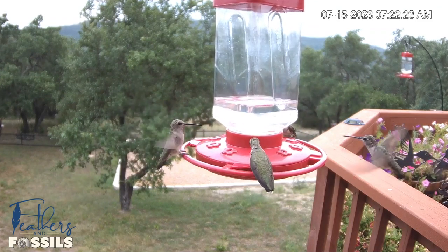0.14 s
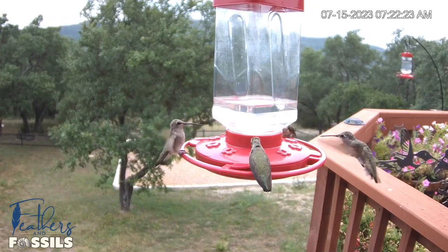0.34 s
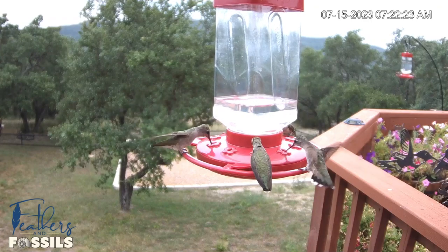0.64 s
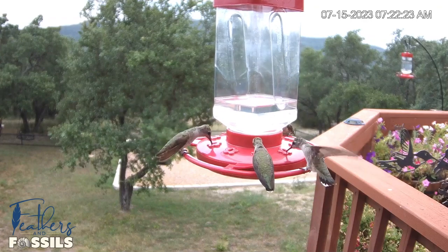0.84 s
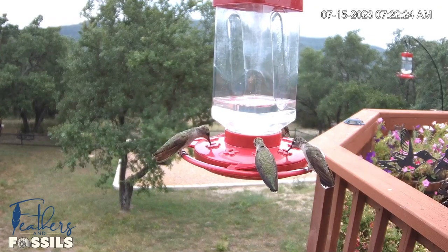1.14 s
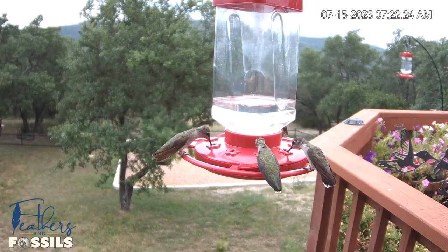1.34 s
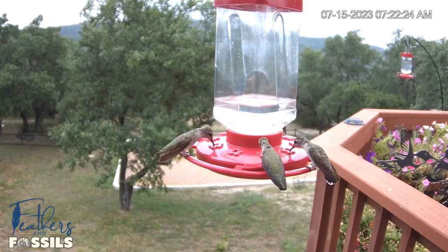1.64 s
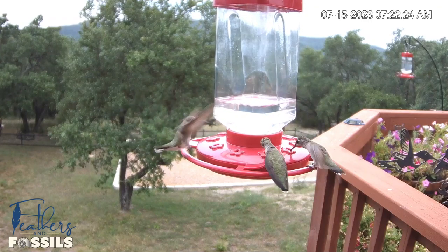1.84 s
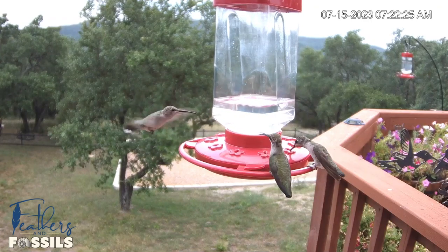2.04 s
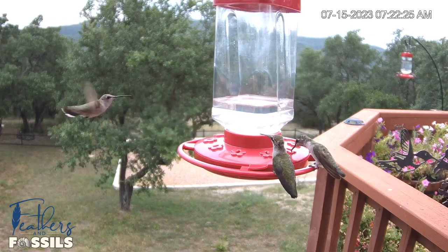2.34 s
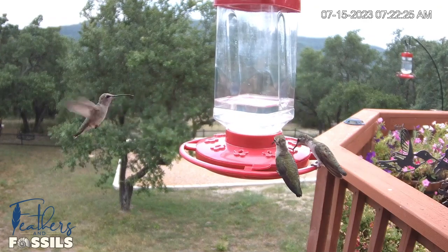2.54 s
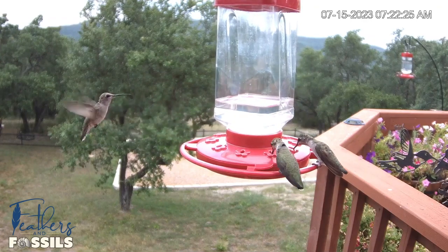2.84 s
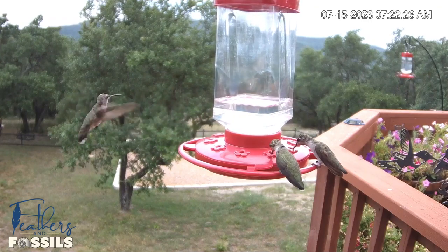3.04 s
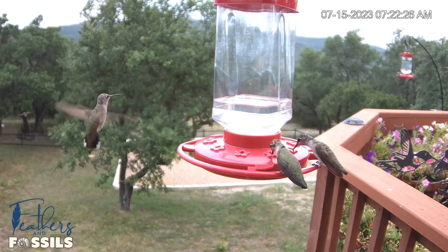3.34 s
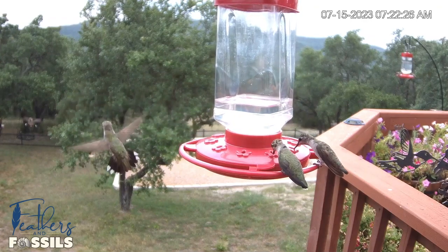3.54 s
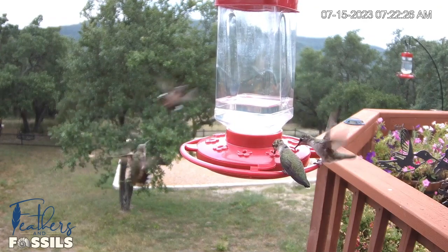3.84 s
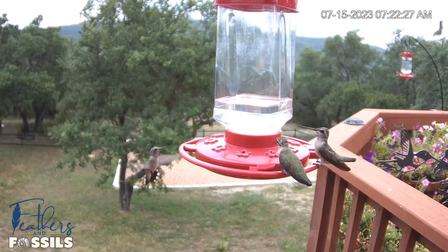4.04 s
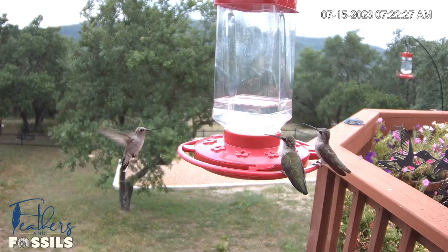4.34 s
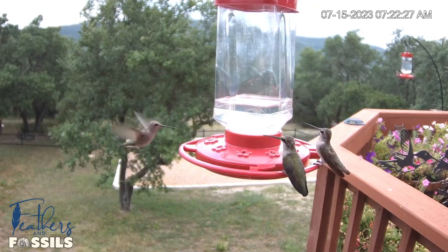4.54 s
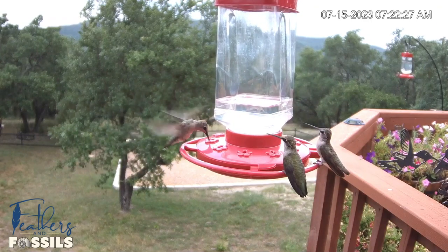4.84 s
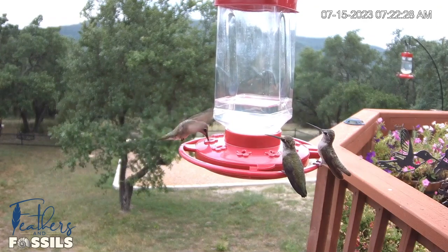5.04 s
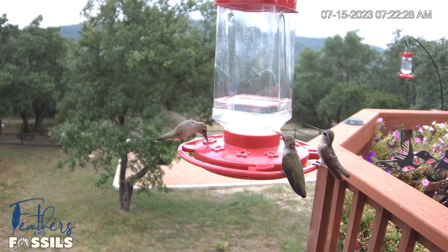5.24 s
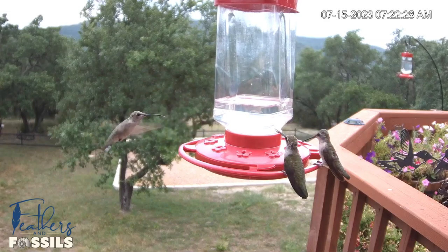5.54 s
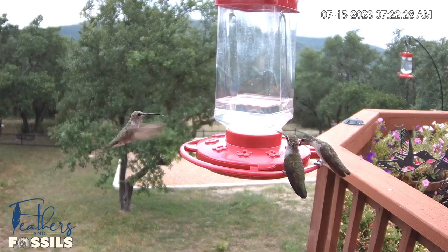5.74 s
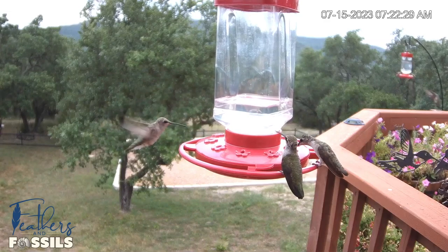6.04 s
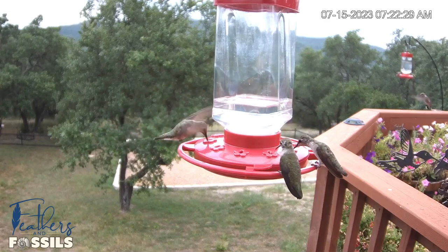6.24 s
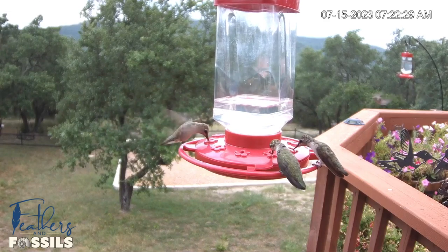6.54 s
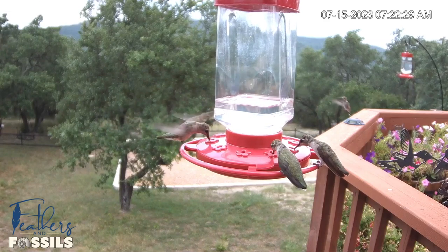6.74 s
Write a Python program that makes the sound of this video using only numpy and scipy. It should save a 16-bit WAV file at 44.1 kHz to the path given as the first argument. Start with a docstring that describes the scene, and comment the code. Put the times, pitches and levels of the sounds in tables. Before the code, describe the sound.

Hummingbirds chip and squabble around an outdoor feeder, softly then in a loud close burst, over rumbling breeze and distant songbirds.

```python
"""Throughout: shaped-noise hush, downwash from hovering wings rumbling in puffs on a small camera's microphone,
a faint sine wing hum, and far songbirds as gliding tones over a noise chorus. From 0.5 s single hummingbird
chips flick upward. At 1.1-1.8 s hummingbirds squabble softly across a deck: falling squeaks, a trilled buzz, a
twitter of pitch arches. At 3.7-4.4 s they squabble loudly close by, with the strongest puffs until 5.1 s; then
chips, far birds and a last puff. Hummingbird calls are tones with overtones, echoed by the house wall,
scattered by the deck and trailed by the trees."""
import sys
import numpy as np
from scipy import signal
from scipy.fft import rfft, irfft, next_fast_len
from scipy.io import wavfile
from scipy.ndimage import uniform_filter1d, map_coordinates

SR = 44100
rng = np.random.default_rng(int(sys.argv[2]) if len(sys.argv) > 2 else 0)


def int16_out(signal):
    """Quantize to a 16-bit WAV file."""
    q = np.round(np.clip(np.atleast_2d(signal).T, -1, 1) * 32767)
    wavfile.write(sys.argv[1], SR, q.astype(np.int16))


N = 303848

# left-right likeness of the outdoor hush: (frequency [Hz], correlation [-1..1])
HUSH_LIKENESS = [(60, 0.29), (200, 0.97), (500, 0.99), (1000, 0.98), (2000, 0.88), (4000, 0.17),
                 (7000, 0.067)]
# decay of the reflections among the trees: (frequency [Hz], t60 [s])
TREE_DECAY = [(1500, .35), (4000, 0.13), (7000, 0.29)]


def amp(db):
    """Decibels to gain."""
    return 10 ** (np.asarray(db) / 20)


def unit(x):
    """Scale to rms 1."""
    return x / np.sqrt(np.mean(x ** 2) + 1e-20)


def along(points, hz):
    """Interpolate (frequency [Hz], value) points on a log frequency axis."""
    point_hz, values = np.transpose(points)
    return np.interp(np.log(hz + 1), np.log(point_hz + 1), values)


def curve(rows):
    """Interpolate (time [s], value) rows to one value per sample."""
    return np.interp(np.arange(N) / SR, *np.transpose(rows))


def filtered(x, response):
    """Apply a frequency response, given as a function of Hz."""
    size = next_fast_len(N + SR // 2)
    spectrum = rfft(x, size) * response(np.fft.rfftfreq(size, 1 / SR))
    return irfft(spectrum, size)[..., :N]


def add(track, start_s, sound):
    """Mix a sound into a track, cut at the track's end."""
    start = max(0, round(start_s * SR))
    part = track[..., start:start + sound.shape[-1]]
    part += sound[..., :part.shape[-1]]


def progress(length_s):
    """Ramp from 0 to 1 over a note."""
    return np.linspace(0, 1, max(int(length_s * SR), 8))


def fade(u, rise, fall):
    """Sine-squared start and end; rise and fall are shares of the note."""
    ramp = np.clip(np.minimum(u / rise, (1 - u) / fall), 0, 1)
    return np.sin(np.pi / 2 * ramp) ** 2


def waver(size_samples):
    """Smoothed random tremble of rms 1."""
    noise = rng.standard_normal(size_samples)
    return unit(uniform_filter1d(uniform_filter1d(noise, size=50), size=40))


def wobble(knots_per_s):
    """Smooth random curve through evenly spaced knots."""
    return map_coordinates(rng.standard_normal(1024), [np.arange(N) * knots_per_s / SR], mode="wrap")


def rush(spectrum, likeness, patchy_db):
    """Stereo noise of rms 1, with random gain patches in time and frequency."""
    bins = signal.stft(rng.standard_normal((2, N)), nperseg=512)[2]
    field = uniform_filter1d(rng.standard_normal(bins.shape[1:]), size=5, axis=0)
    field = uniform_filter1d(field, size=14, axis=1)
    pair = signal.istft(bins * amp(patchy_db * unit(field)), nperseg=512)[1][:, :N]

    def mid_side_response(hz):
        # mid/side power split sets the left-right correlation
        angle = np.arccos(np.clip(along(likeness, hz), -1, 1)) / 2
        return amp(along(spectrum, hz)) * [np.cos(angle), np.sin(angle)]

    mid, side = filtered(pair, mid_side_response)
    return unit(np.array([mid + side, mid - side]))


def diffuse(sound, decay, width=0.88):
    """Convolve with a fresh stereo noise tail whose decay time depends on frequency."""
    hz, t, bins = signal.stft(rng.standard_normal((2, SR // 2)), SR, nperseg=128)
    decay_gain = amp(-60 * t / along(decay, hz)[:, None])
    mid, side = signal.istft(bins * decay_gain, SR, nperseg=128)[1]
    tail = np.array([mid + width * side, mid - width * side])
    return signal.fftconvolve(sound[None], tail / np.linalg.norm(tail[0]), axes=1)


def outdoor_hush(level_db=-64.0):
    """Steady noise weighted to the low end."""
    # (frequency [Hz], relative density [dB per Hz])
    hush_spectrum = [(25, -15.5), (55, -11.5), (100, -4.5), (160, -4), (230, -3), (400, -4.5), (720, -10.5),
                     (1100, -17.5), (1600, -23.5), (2800, -33), (4500, -39.5), (7500, -42.5)]
    return amp(level_db) * rush(hush_spectrum, HUSH_LIKENESS, patchy_db=1)


def buffeting(flutter_db=2, flutter_knots_per_s=12, rumble_db=-4, evenness=.6, low_cut_hz=40,
              rise=0.19, fall=0.4, sag=0.31, lag_s=0.001094):
    """Downwash from hovering wings rumbles on the microphone; puffs swell it, push at a sinking pitch and stir
    turbulence."""
    # puffs of air: (time [s], length [s], mid-puff pitch [Hz], flow level [dB], turbulence re flow [dB])
    puffs = [(.01, .16, 55, -49, -24), (0.354, 0.11, 60, -49, -9.5), (0.659, .13, 53, -51, -22),
             (.992, 0.066, 69.2, -42, -23), (1.292, 0.13, 75.5, -34, -21.5),
             (1.433, 0.099, 71.3, -38.5, -11.5), (1.551, 0.08, 69.3, -34.5, -10),
             (1.696, 0.057, 75.8, -39.5, -21), (1.8, 0.083, 59, -35, -20), (1.92, .11, 64.4, -36.5, -21),
             (2.189, .1, 58.3, -43.5, -20.5), (2.537, 0.067, 63.4, -40.5, -29),
             (3.222, 0.086, 67.3, -42.5, -28), (3.331, 0.09, 60.3, -47, -25), (3.478, 0.16, 66.9, -45, -26),
             (3.767, .12, 65.4, -37, -25.5), (3.934, .13, 83.2, -29, -16.5), (4.158, 0.077, 60.5, -39, -26),
             (4.299, .12, 69, -37, -19.5), (4.434, .06, 74.6, -37.5, -18), (4.579, 0.096, 62.2, -42, -25),
             (4.815, 0.086, 65.7, -37.5, -24), (4.902, 0.11, 72, -28.5, -10), (5.003, 0.086, 66, -30, -19),
             (5.093, 0.054, 61.2, -41, -26), (5.897, 0.08, 70.5, -45, -30), (6.15, 0.16, 61.8, -52.5, -27),
             (6.631, 0.069, 62, -43.5, -26), (6.82, 0.22, 75.9, -32, -17)]
    # drifting air: (time [s], level [dB])
    downwash_levels = [(0.0, -55), (0.9, -73.5), (1.38, -49.5), (1.5, -40), (1.84, -42), (1.98, -45.5),
                       (2.38, -68.5), (2.84, -59.5), (3.36, -49), (3.57, -51), (4.18, -44.5), (4.49, -43.5),
                       (4.64, -53), (4.85, -54), (4.99, -41.5), (5.55, -61.5), (6.5, -65.5), (6.89, -51)]
    # rumble ahead of the low cut: (frequency [Hz], relative density [dB per Hz])
    rumble_spectrum = [(15, -47.5), (25, -15.5), (40, 1), (52, 5), (66, 1), (80, -2.5), (100, -9),
                       (170, -25), (300, -37.5), (420, -46), (900, -87)]
    # rumble ahead of the port lag: (frequency [Hz], left-right correlation [-1..1])
    rumble_likeness = [(30, 1), (70, 1), (130, 0.6)]
    # turbulence ahead of the low cut: (frequency [Hz], relative density [dB per Hz])
    swirl_spectrum = [(50, -6), (120, 9), (200, -6), (350, -10.5), (700, -38), (1500, -54.5)]

    gusts, pushes, stir = np.zeros((3, N))
    for start_s, length_s, pitch_hz, db, turbulence_db in puffs:
        u = progress(length_s)
        flow = amp(db) * fade(u, rise, fall)
        sinking_hz = pitch_hz * (1 - sag * (u - .5))
        cycles = rng.random() + np.cumsum(sinking_hz) / SR
        add(gusts, start_s, flow)
        add(stir, start_s, amp(turbulence_db) * flow)
        add(pushes, start_s, flow * np.sin(2 * np.pi * cycles))

    eddies = rush(rumble_spectrum, rumble_likeness, patchy_db=2)
    power = uniform_filter1d(np.mean(eddies ** 2, axis=0), size=1500)
    strength = np.sqrt(np.abs(power) + 1e-6)
    even_eddies = unit(eddies / strength ** evenness)
    downwash = amp(curve(downwash_levels) + flutter_db * wobble(flutter_knots_per_s))
    rumble = np.hypot(downwash, amp(rumble_db) * gusts) * even_eddies
    turbulence = stir * rush(swirl_spectrum, [(100, 0.77)], patchy_db=2.5)

    def port_response(hz):
        # air reaches the left port first
        lag = np.exp(1j * np.pi * hz * lag_s * np.array([[1], [-1]]))
        return lag * hz ** 2 / np.hypot(hz ** 2, low_cut_hz ** 2)

    return filtered(rumble + pushes + turbulence, port_response)


def wings(hum_hz=96, drift=0.091, flutter_db=4):
    """Faint sine hum of hovering wings, unsteady in pitch and level."""
    # (time [s], level [dB])
    hum_levels = [(0, -59), (.45, -59.5), (.85, -74), (1.15, -67.5), (2.45, -66), (2.8, -72), (5.5, -72.5),
                  (6.89, -71.5)]
    hz = hum_hz * (1 + drift * wobble(22))
    hum = unit(np.sin(2 * np.pi * np.cumsum(hz) / SR))
    return amp(curve(hum_levels) + flutter_db * wobble(14)) * hum


def songbirds(chorus_db=-80, wet_db=-5, direct_db=-1):
    """Far gliding whistles, rasped by random pitch and blurred by the trees, over a patchy noise chorus."""
    # (frequency [Hz], relative density [dB per Hz])
    chorus_spectrum = [(2000, -23), (2600, -6.5), (3300, -6), (3750, 0), (4200, -5), (5300, -9),
                       (5900, -4.5), (6550, -2.5), (7200, 0), (7600, -9)]
    # (time [s], length [s], start pitch [Hz], end pitch [Hz], rms pitch rasp [Hz],
    #  level ahead of the direct/wet split [dB])
    whistles = [(0.062, 0.1, 3910, 4000, 150, -68), (0.341, 0.11, 3970, 3680, 250, -74),
                (2.383, 0.11, 6680, 6460, 444, -74), (2.848, 0.046, 4990, 4760, 50, -68.5),
                (4.463, .10, 5850, 5590, 60.1, -62), (4.506, 0.071, 4120, 4150, 60.3, -72.5),
                (4.675, 0.049, 3670, 3830, 180, -74), (4.85, 0.048, 2194, 2230, 30, -74.5),
                (4.933, 0.097, 2380, 2510, 30, -73.5), (5.12, 0.057, 5682, 6770, 401.3, -70.5),
                (5.154, 0.038, 2290, 2090, 39.97, -76.5), (5.207, 0.16, 2240, 2393, 29.66, -78),
                (5.321, 0.11, 2370, 2460, 29.9, -76), (5.468, 0.12, 4010, 4020, 280.8, -76),
                (5.804, 0.024, 3600, 3000, 704, -73.5), (6.145, 0.12, 5630, 4900, 50, -77),
                (6.527, 0.046, 4195, 4310, 111, -76.5)]
    out = amp(chorus_db) * rush(chorus_spectrum, HUSH_LIKENESS, patchy_db=7.0)
    for start_s, length_s, start_hz, end_hz, rasp_hz, db in whistles:
        u = progress(length_s)
        hz = start_hz + (end_hz - start_hz) * u + rasp_hz * waver(len(u))
        tone = amp(db) * fade(u, rise=0.32, fall=0.34) * np.sin(2 * np.pi * np.cumsum(hz) / SR)
        add(out, start_s, amp(direct_db) * tone)
        add(out, start_s, amp(wet_db) * diffuse(tone, TREE_DECAY))
    return out


def syrinx(hz, jitter=0.019):
    """A slightly unsteady tone with overtones coloured by fixed resonances."""
    # (multiple of the pitch, level ahead of the colouring [dB])
    overtones = [(1, -2.5), (2, -5), (3, 0), (4, -13), (5, -28)]
    # (frequency [Hz], gain [dB])
    call_colour = [(1250, -27), (1600, -9.5), (1950, -9), (2800, -3), (3300, 0.5), (3800, 0.5),
                   (4550, -8.5), (5100, 0.5), (5500, -2), (6100, 3.5), (6700, 4.5), (7200, 8), (7700, 4)]
    hz = hz * (1 + jitter * waver(len(hz)))
    phase = 2 * np.pi * np.cumsum(hz) / SR
    tone = 0
    for multiple, db in overtones:
        partial_hz = multiple * hz
        band_gain = np.clip(4 - 12 * partial_hz / SR, 0, 1)  # fades out from SR/4 to SR/3
        tone = tone + amp(db + along(call_colour, partial_hz)) * band_gain * np.sin(multiple * phase)
    return tone


def chip(length_s=0.016, start_hz=5850, end_hz=7200, bend=0.55):
    """A short upward flick, fastest at its start."""
    u = progress(length_s)
    hz = start_hz + (end_hz - start_hz) * u ** bend
    return fade(u, rise=0.33, fall=0.18) * syrinx(hz, jitter=0.048)


def squeak(length_s, start_hz, end_hz, bend, jitter):
    """A falling whistle, raspier with more pitch jitter."""
    u = progress(length_s)
    hz = start_hz + (end_hz - start_hz) * u ** bend
    return fade(u, rise=.16, fall=0.12) * syrinx(hz, jitter)


def buzz(length_s, start_hz, end_hz, depth_hz, trills_per_s, bend=1.3, slowing=.25):
    """A falling note with a fast pitch trill that slows as the pitch sinks."""
    u = progress(length_s)
    trill = np.cos(2 * np.pi * np.cumsum(trills_per_s * (1 - slowing * (u - .5))) / SR)
    hz = start_hz + (end_hz - start_hz) * u ** bend + depth_hz * trill
    return fade(u, rise=.35, fall=0.3) * syrinx(hz, jitter=.015)


def twitter(length_s, arches_per_s, top_hz, first_dip_hz, middle_dip_hz, last_dip_hz, dip_db, swell_db,
            flatness=3.6, swell_bend=1.4):
    """One unbroken tone swings through flat-topped pitch arches, its dips drifting as it swells or fades."""
    u = progress(length_s)
    swing = np.abs(np.cos(np.pi * arches_per_s * length_s * u))
    sag = np.sin(np.pi / 2 * swing ** (2 * flatness))  # 0 at the top, 1 in the dips
    dip_hz = np.interp(u, [0, .5, 1], [first_dip_hz, middle_dip_hz, last_dip_hz])
    tone = syrinx(top_hz - sag * (top_hz - dip_hz), jitter=.013)
    level = amp(swell_db * u ** swell_bend + dip_db * sag)
    return fade(u, rise=.003 / length_s, fall=0.013) * level * tone


def heard(sound, bearing, distance, tail_db, near_scatter_db=-14, far_scatter_db=-1,
          direct_delay_s=0.0011, bounce_delay_s=0.0045):
    """A call in stereo: direct, scattered by the deck, thrown back by the wall, fading in the trees."""
    # echoes of the house: (delay [s], level [dB], bearing [signed share of the stereo phase])
    wall_echoes = [(0.0284, -8.5, 0.94), (0.0559, -43.5, 0)]
    # scatter of the deck: (frequency [Hz], t60 [s])
    deck_decay = [(1500, 0.099), (7000, 0.079)]
    # left-right phase difference at bearing 1: (frequency [Hz], phase [rad])
    stereo_phase = [(600, .1), (1300, .5), (1750, 0.83), (2500, 1.5), (5000, 1.6), (7000, 1.31)]
    # colour of a call at distance 1, from across the deck: (frequency [Hz], gain [dB])
    far_gain = [(1600, -4), (2100, 4), (2800, -18), (3600, -2.5), (4200, 7), (4800, -2.5), (6000, -3.5),
                (6700, 4), (7300, -7.5)]

    size = 2 ** 15
    hz = np.fft.rfftfreq(size, 1 / SR)
    scatter = amp(near_scatter_db + distance * (far_scatter_db - near_scatter_db))
    direct = rfft(sound, size)
    cloud = scatter * rfft(diffuse(sound, deck_decay), size)
    paths = 0
    for delay_s, db, side in [(direct_delay_s, 0, bearing)] + wall_echoes:
        left_right = np.exp(.5j * side * along(stereo_phase, hz) * np.array([[-1], [1]]))
        delay = np.exp(-2j * np.pi * hz * delay_s)
        paths = paths + amp(db) * delay * (direct * left_right + cloud)
    bounce = distance ** 2  # far calls also bounce off the deck boards
    paths = paths * (1 + bounce * np.exp(-2j * np.pi * hz * bounce_delay_s)) / np.hypot(1, bounce)
    tail = amp(tail_db) * rfft(diffuse(sound, TREE_DECAY), size)
    colour = amp(distance * along(far_gain, hz))
    return irfft((paths / np.hypot(1, scatter) + tail) * colour, size)


def hummingbirds(squabble_bearing=-1, chip_bearing=-1.4, chip_distance=0.28,
                 near_tail_db=-28, far_tail_db=-16):
    """Rivals squabble around a feeder, drier the nearer they are; single chips. Direct calls share a left-right
    phase shift."""
    # (time [s], level [dB], tree tail re call [dB])
    chips = [(0.508, -56.5, 3.5), (1.678, -42.5, -7), (3.088, -50.5, 7), (4.343, -44.5, -1),
             (4.757, -71.5, 3.5), (4.885, -68.5, -4), (5.268, -57, 0), (5.829, -58, -9),
             (6.308, -64.5, 6.5), (6.785, -47.5, 0.5)]
    # (time [s], length [s], start pitch [Hz], end pitch [Hz], bend [<1 falls early, >1 late],
    #  rms pitch jitter [share], level [dB], distance [0-1])
    squeaks = [(1.091, 0.021, 2390, 1784, 0.78, 0.027, -55, 0.56),
               (1.356, .019, 5200, 1803, 1.1, 0.064, -45, .7),
               (1.431, .013, 3900, 1750, 1, 0.06, -47, 0.58),
               (1.498, 0.015, 4020, 1900, 1.24, .12, -50.5, 0.72),
               (1.579, .015, 3960, 2140, 1.18, .12, -52, 0.61),
               (1.651, .017, 4170, 2000, 2.5, .05, -54.5, 0.9),
               (1.744, 0.019, 3914, 2034, 2.7, 0.12, -55, 0.59),
               (4.032, 0.031, 3900, 1794, 0.67, 0.034, -32, 0),
               (4.103, 0.029, 4060, 1700, 0.64, 0.021, -28.5, 0.1),
               (4.18, .03, 3710, 1636, 0.7, 0.02, -29.5, 0)]
    # (time [s], length [s], start pitch [Hz], end pitch [Hz], trill depth [Hz], mid-note trill rate [1/s],
    #  level [dB], distance [0-1])
    buzzes = [(1.266, 0.048, 4470, 2100, 815, 203, -42, 0.76), (3.919, 0.041, 5260, 4135, 800, 187, -26, 0),
              (3.944, 0.034, 4405, 2583, 982, 254, -29.5, 0.42),
              (4.27, .045, 4057, 2313, 957, 192, -26.5, 0.3),
              (4.376, 0.038, 4330, 2333, 997, 175, -25.5, 0.29)]
    # (time [s], length [s], arch rate [1/s], top [Hz], first dip [Hz], middle dip [Hz], last dip [Hz],
    #  level in the dips re top [dB], swell by the end [dB], level [dB], distance [0-1])
    twitters = [(1.114, 0.12, 71, 6840, 5020, 3410, 2670, 6.5, -10.5, -59, 0.57),
                (3.6695, 0.025, 71, 6850, 6400, 3720, 4770, 5, 9, -37, 0.36),
                (3.698, .062, 48.5, 6260, 5370, 5200, 3670, -3, -1, -26, .1),
                (3.793, 0.13, 71, 6220, 5430, 3687, 2800, -8, -16, -24.5, .05)]

    out = np.zeros((2, N))
    for call, table in [(squeak, squeaks), (buzz, buzzes), (twitter, twitters)]:
        for start_s, *shape, db, distance in table:
            tail_db = near_tail_db + distance * (far_tail_db - near_tail_db)
            add(out, start_s, amp(db) * heard(call(*shape), squabble_bearing, distance, tail_db))
    for start_s, db, tail_db in chips:
        add(out, start_s, amp(db) * heard(chip(), chip_bearing, chip_distance, tail_db))
    return out


def scene():
    """Hush, air, wing hum and far songbirds under the hummingbirds."""
    return outdoor_hush() + buffeting() + wings() + songbirds() + hummingbirds()


def record(dry, top_hz=7220):
    """The camera's narrow band: a steep low-pass, half power at top_hz."""
    return filtered(dry, lambda hz: 1 / np.sqrt(1 + (hz / top_hz) ** 170))


dry = scene()
out = record(dry)
int16_out(out)
```